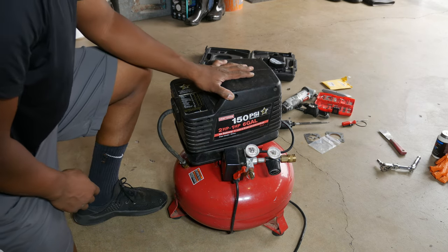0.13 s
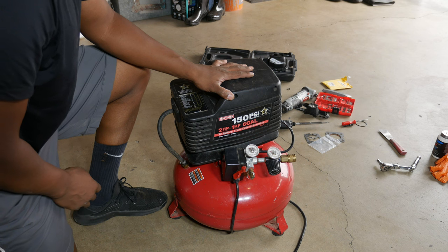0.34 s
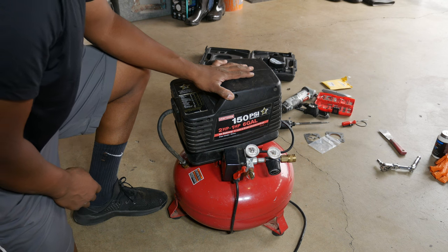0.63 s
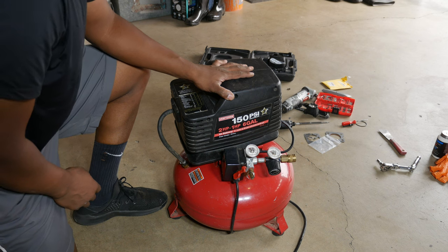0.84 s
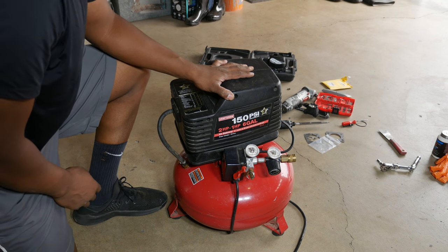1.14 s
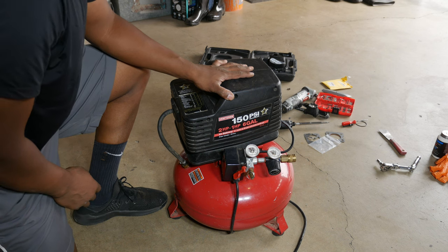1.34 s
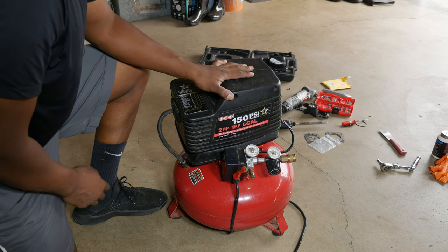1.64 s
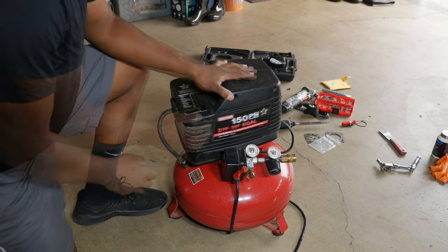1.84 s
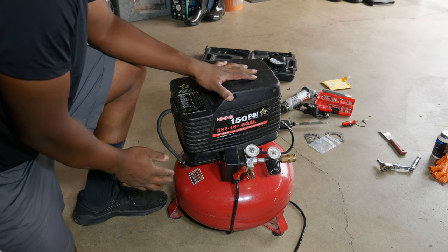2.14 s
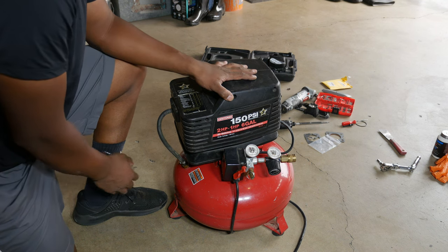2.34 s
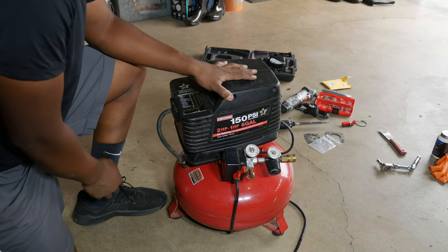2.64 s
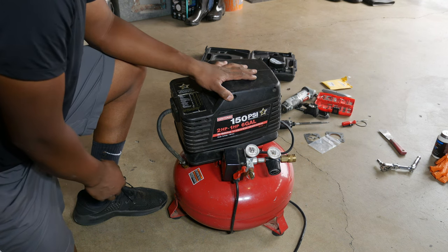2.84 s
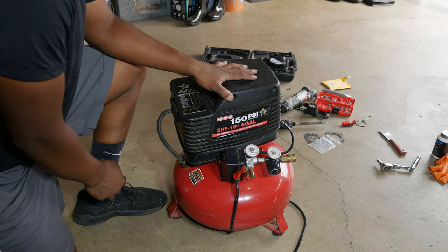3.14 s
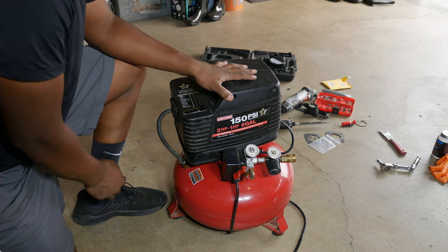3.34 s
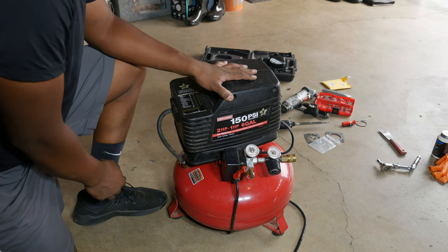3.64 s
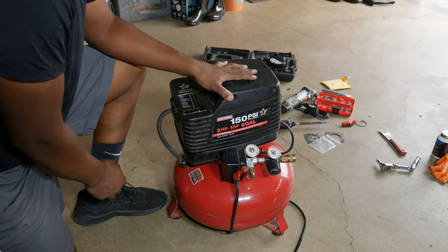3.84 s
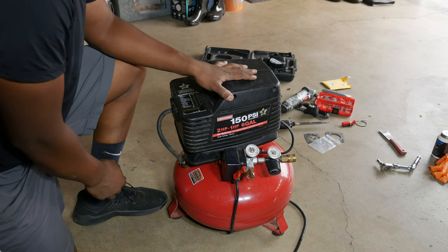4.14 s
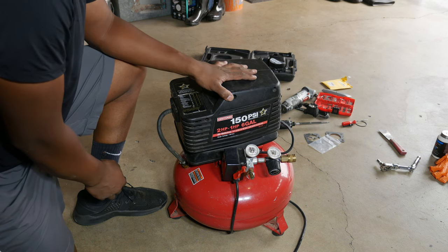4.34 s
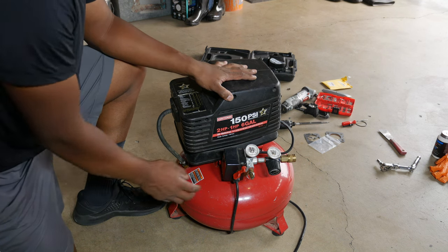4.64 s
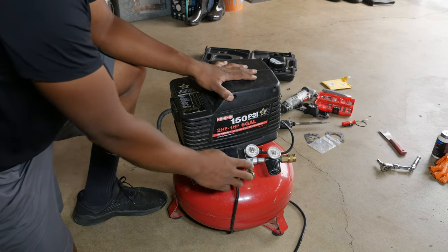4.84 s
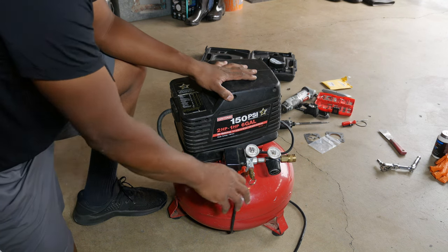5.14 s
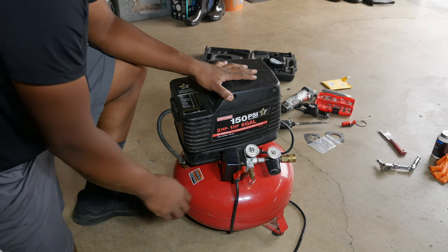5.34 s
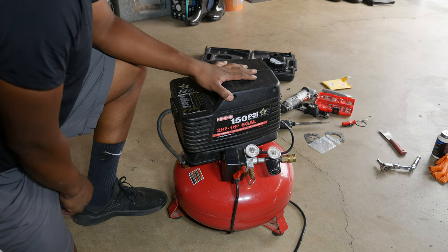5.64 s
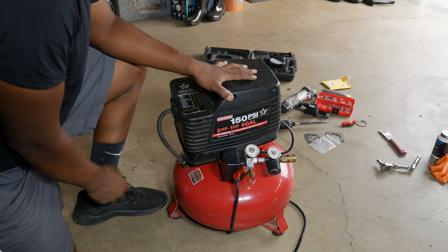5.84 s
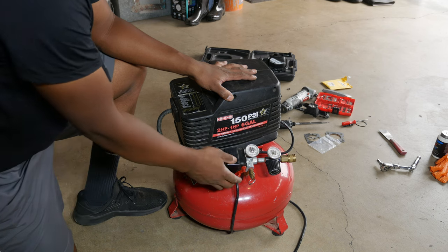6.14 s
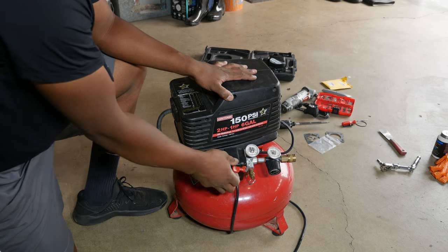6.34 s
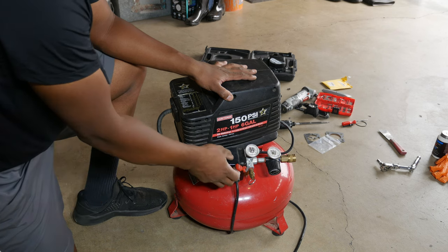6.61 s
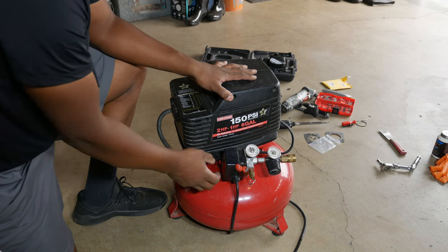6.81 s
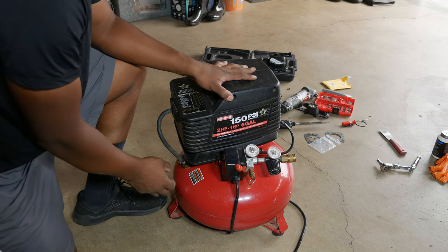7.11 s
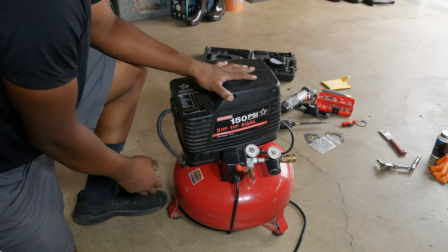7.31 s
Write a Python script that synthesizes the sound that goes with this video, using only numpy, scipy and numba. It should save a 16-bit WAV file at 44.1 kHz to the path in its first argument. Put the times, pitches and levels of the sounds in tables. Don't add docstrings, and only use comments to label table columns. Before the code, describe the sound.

A small piston air compressor hammers steadily in a garage, shifts to a harsher high-pressure run, then is switched off, knocking down to a thin leaking hiss.

```python
import sys
import numpy as np
from scipy import signal
from scipy.fft import rfft, irfft, next_fast_len
from scipy.io import wavfile
from scipy.ndimage import uniform_filter1d
from numba import njit

SR = 44100
rng = np.random.default_rng(int(sys.argv[2]) if len(sys.argv) > 2 else 0)


def makeup_ratio(level_db):
    decades = np.asarray(level_db, float) / 20
    return 10 ** decades


def file_out(sig):
    cols = np.atleast_2d(sig).T
    lim = np.clip(cols, -1, 1)
    pcm = np.round(lim * 32767).astype(np.int16)
    wavfile.write(sys.argv[1], SR, pcm)


N = 329427
T = np.arange(N) / SR

# [order/crank speed, level/dB]
ORDERS_PART = [(1, -10.0), (2, -5.0), (3, -20.0), (4, -4.0), (5, -7.5), (6, -15.5), (7, -1.0), (8, -20.5),
               (9, -9.0), (10, -7.0), (11, -3.0), (12, -17.0), (13, -5.0), (14, -9.5), (15, -9.5), (16, 1.0),
               (17, -10.5), (18, -8.5), (19, -9.5), (20, -13.5), (21, -13.5), (22, -8.0), (23, -14.5),
               (24, -12.0), (25, -13.0), (26, -3.0), (27, -2.0), (28, -3.0), (29, -2.5),
               (30, -3.5), (31, -7.5), (32, -2.5), (33, -23.0), (34, 1.5), (35, 0.5), (36, -1.0), (37, -6.5),
             (38, -1.0), (39, -9.0), (40, -3.5), (41, 0.0), (42, -4.5), (43, -3.0), (44, -10.5), (45, -7.5),
             (46, -19.5), (47, -12.0), (48, 0.0), (49, -6.0), (50, -2.0), (51, -17.0), (52, -5.5),
             (53, -12.0), (54, -8.0), (55, -6.0), (56, -9.0), (57, -3.5), (58, -17.5)]
ORDERS_FULL = [(1, -8.0), (2, -1.5), (3, -8.5), (4, -5.0), (5, -0.5), (6, -23.5), (7, 0.0), (8, -7.0),
               (9, -5.0), (10, -1.5), (11, 2.0), (12, -8.0), (13, -13.5), (14, -9.0), (15, -3.0),
               (16, -23.5), (17, 4.0), (18, -14.0), (19, -0.5), (20, -8.5), (21, 1.0), (22, -3.5),
               (23, -13.0), (24, -12.5), (25, -5.5), (26, 1.0), (27, 1.5), (28, 3.0), (29, -1.5),
               (30, -2.5), (31, -5.0), (32, 0.0), (33, 0.5), (34, -3.5), (35, -1.0), (36, -0.5), (37, -2.5),
             (38, -1.0), (39, 2.0), (40, 4.5), (41, -1.5), (42, 3.0), (43, 2.5), (44, -2.0), (45, 3.5),
             (46, -6.0), (47, -4.0), (48, -5.5), (49, -0.5), (50, -3.5), (51, -5.5), (52, -6.0), (53, -5.5),
             (54, -17.0), (55, -14.5), (56, -10.0), (57, -7.5), (58, -5.5)]
# [order/crank speed, level/dB]
WHINE_PART = [(60, -12.0), (63, -7.0), (64, -9.0), (65, -11.5), (66, -11.5), (68, -2.0), (69, -15.0),
              (73, -12.0), (75, -7.0), (78, -6.5), (79, -5.0), (83, -7.0), (84, -1.5), (85, -8.5),
              (86, -2.5), (87, -6.5), (92, -6.5), (96, 1.5), (106, 1.5), (107, -5.5)]
WHINE_FULL = [(59, -14.0), (60, -13.0), (61, -13.0), (64, -10.5), (65, -11.5), (66, -12.5), (67, -9.5),
              (70, -14.0), (72, -13.5), (75, -11.0), (77, -9.5), (80, -10.0), (83, -7.0), (87, -3.0),
              (93, -3.0), (103, -5.0), (105, -3.0), (106, -4.5), (107, 0.0), (109, -1.5)]
# [f/Hz, density/dB per Hz]
ROAR_PART = [(18, -46), (30, -16), (92, -17), (137, -9), (173, -10.5), (325, -3.5), (676, -5.5),
             (732, -6.5), (1080, -11.5), (1600, 1), (3170, -5), (4950, -5.5), (7140, -17.5), (10300, -18),
             (15600, -26)]
ROAR_FULL = [(25, -27), (225, -6.5), (494, -3.5), (578, -8.5), (771, -7), (1060, -8.5), (1230, -8.5),
             (1880, -1.5), (2600, -3.5), (3250, -8), (4200, -6), (6950, -17), (10500, -18.5), (15600, -26)]
# [f/Hz, width/Hz, gain/dB]
SHROUD_DIP = (3080, 800, -5.5)
INTAKE_LIFT = (5500, 1470, 3.7)
# [start/s, end/s]
FADE_S = (1.74, 2.03)
# [t/s, low tank ring level/dB, high ring relative to low/dB]
KNOCKS = [(6.409, -26, 2), (6.452, -31, 8), (6.469, -35, 5), (6.499, -27.5, 4), (6.544, -27, 1),
          (6.562, -37, 11), (6.597, -25.5, 1.5), (6.630, -35, 5), (6.706, -28.5, 1.5), (6.732, -32, -10),
          (6.752, -40, 3), (6.853, -30, -15), (6.908, -38, -22)]
# [f/Hz, level/dB, t60/s]
RINGS = [
    [(180, -16, 0.034), (250, -9, .03), (482, -6.5, 0.041)],
    [(334, -1.5, 0.34), (383, 5, 0.06)],
    [(762, 4.5, 0.13), (820, 5, 0.051)],
    [(1195, 10, 0.048)],
    [(1630, 4.5, 0.034), (1990, -8, 0.05)],
]
# [t/s, level/dB]
TICKS = [
    (6.627, -19),
    (6.761, -20.5),
]
# [t/s, level/dB, f/Hz]
CLICKS = [
    (2.1, -24, 5500),
    (6.358, -26, 7000),
]
# [f/Hz, width/Hz, level/dB]
FITTING = [(1980, 61, -17.5), (2510, 110, -12), (3190, 68, -16.5), (4375, 170, -9), (4750, 130, -5),
           (5019, 85, 2.5), (5180, 110, -2), (5570, 220, -4.5), (5930, 78, -6.5)]
# [f/Hz, width/Hz, level/dB]
JET = [(7100, 190, 0), (7940, 350, -5), (8300, 250, -6), (9020, 230, -9), (9800, 230, -7), (10600, 160, -6),
       (11300, 150, -1), (12100, 250, -5), (12660, 300, -1.5), (13500, 260, 2), (14200, 300, -12),
       (14530, 300, -1), (15300, 200, -4)]
# [f/Hz, density/dB per Hz]
SKIRT = [(530, -67), (900, -39), (1980, -24), (2150, -26.5), (2510, -19), (3510, -21), (4730, -7.5),
         (5010, 5), (6800, -23), (8840, -35), (15000, -120)]
# [t/s, level/dB]
FLOW = [
    (0, -9.5),
    (1.85, -3),
    (2.1, 1),
    (6.3, 0.5),
    (6.47, 2.5),
    (6.65, 3),
    (7.47, 2.5),
]
# [f/Hz, density/dB per Hz]
GARAGE = [(15, -50), (25, -25), (85, -6), (227, -17), (485, -11), (564, -10), (690, -21), (1220, -7),
          (1400, -8), (1820, -3), (3080, -120)]
# [f/Hz, width/Hz, gain/dB]
MIC_DIPS = [(7180, 1130, -4.5), (8680, 560, -2.5), (11480, 1070, -12.5)]

PART_HZ, PART_SAG_HZ_PER_S, FULL_HZ, FULL_SAG_HZ_PER_S = 46.2, .055, 45.49, .045
OFF_S, COAST_S = 6.362, .22
SLAP_ORDER = 42
PART_DB, PART_DB_PER_S, FULL_DB = -21, -0.53, -22.5
SHADE_S, SHADE_DB = 6.17, -2.1
DYING_DB_PER_S2, DULLING_DB_PER_S, DULLEST_DB = -125, -21, -8
RISE_DB, RISE_S = 1, 0.025
THUMP_DB, FRAME_DB, VALVE_DB = 21, 3, -12
THUMP_FOLLOWS, FRAME_FOLLOWS, VALVE_FOLLOWS = .95, 1.2, .7
JET_DB, WHISTLE_DB, WHISTLE_FOLLOWS, SPUTTER_DB = -41, -28.5, 1, 0.53
SURGE_S, SURGE_DB, SURGE_WIDTH_S = 6.75, 4, 0.042
GARAGE_DB, HUM_HZ, HUM_DB = -51.5, 570, -62
TOP_HZ = 15550


def compressor():
    since = coasting()
    part_hz = PART_HZ - PART_SAG_HZ_PER_S * T
    full_hz = (FULL_HZ - FULL_SAG_HZ_PER_S * (T - 2)) * np.exp(-since / COAST_S)
    part = pump(part_hz, ORDERS_PART, WHINE_PART, ROAR_PART,
                line_db=-11.0, spread=1.2, puff=0.26, treble_db=0.46, until_s=2.1)
    dulling_db = np.maximum(DULLING_DB_PER_S * since, DULLEST_DB)
    full = pump(full_hz, ORDERS_FULL, WHINE_FULL, ROAR_FULL,
                line_db=-12.0, spread=0.64, puff=0.24, treble_db=dulling_db, until_s=7)
    share = np.interp(T, FADE_S, (0, 1))
    shade_times_s = (SHADE_S - .02, SHADE_S + .02, OFF_S - .03, OFF_S)
    shade_db = SHADE_DB * np.interp(T, shade_times_s, (0, 1, 1, 0))
    rise_db = RISE_DB * (1 - np.exp(-since / RISE_S))
    full_db = FULL_DB + shade_db + DYING_DB_PER_S2 * since ** 2 + rise_db
    return (1 - share) * makeup_ratio(PART_DB + PART_DB_PER_S * T) * part + share * makeup_ratio(full_db) * full


def coasting():
    return np.maximum(T - OFF_S, 0)


def pump(hz, orders, whine, roar, line_db, spread, puff, treble_db, until_s):
    turns = np.cumsum(hz) / SR
    spin = makeup_ratio(75 * np.log10(hz / hz[0]))
    live = turns[:int(until_s * SR)]
    slip = 0.00093 * walk(40, size=len(live))
    tones = np.zeros(N)
    tones[:len(live)] = lines(orders, live + slip, wobble=0.29, jitter=0.27, spread=spread, smear=0.18, lag=9)
    tones[:len(live)] += lines(whine, live, wobble=.5, jitter=.45, spread=0, smear=0, lag=0)
    noise, centres = bands(roar, count=10)
    noise[0] *= spin
    swell, rush = walk(3.05), walk(16)
    air = 0
    for band, centre in zip(noise, centres):
        is_treble = centre > 3000
        depth = puff * min(1., (3500 / centre) ** 0.41)
        offset = 0.46 * rng.standard_normal() * is_treble
        gate = 1 + depth * np.cos(2 * np.pi * (turns + offset))
        tilt_db = treble_db * np.clip(np.log2(centre / 1900), 0, 3.0)
        flutter_db = 0.48 * swell + 0.71 * walk(14) + 0.22 * is_treble * rush
        air = air + band * gate * makeup_ratio(flutter_db + tilt_db)
    for band_hz, width_hz, db in (SHROUD_DIP, INTAKE_LIFT):
        air = air - (1 - makeup_ratio(db)) * resonate(air, band_hz, width_hz)
    return spin * makeup_ratio(line_db) * tones + air


def lines(table, turns, wobble, jitter, spread, smear, lag):
    rows = np.array(table, float)
    order, step = np.round(rows[:, :1]), SR // 50
    chance = rng.standard_normal((2, len(rows), N // step + 2))
    size = makeup_ratio(rows[:, 1:2]) * (1 + wobble * uniform_filter1d(chance[0], size=7))
    slap = (order > 14) & (order < 50)
    slap_spread = spread * (0.71 + 2.78 * abs(np.log2(order / SLAP_ORDER)))
    start = rng.standard_normal(order.shape) * np.where(slap, slap_spread, 10)
    start += np.cumsum(smear * rng.standard_normal(order.shape), axis=0)
    start -= lag * np.log(order)
    shift = start + jitter * uniform_filter1d(chance[1], size=4)
    return sines(order[:, 0].copy(), turns, size, shift, step)


@njit
def sines(orders, turns, size, shift, step):
    out = np.zeros(len(turns))
    for k in range(len(orders)):
        for j in range(len(turns) // step):
            swell = (size[k, j + 1] - size[k, j]) / step
            slide = (shift[k, j + 1] - shift[k, j]) / step
            for u in range(step):
                phase = 2 * np.pi * orders[k] * turns[j * step + u] + shift[k, j] + u * slide
                out[j * step + u] += (size[k, j] + u * swell) * np.sin(phase)
    return out


def knocks():
    out = np.zeros(N)
    thump, low, high, frame, valve = RINGS
    for (s, db, high_db), after in zip(KNOCKS, KNOCKS[1:] + [(9,)]):
        speed_db = -20 * np.log10(np.e) * (s - OFF_S) / COAST_S
        parts = ((thump, THUMP_DB + THUMP_FOLLOWS * speed_db),
                 (low, 0),
                 (high, high_db),
                 (frame, FRAME_DB + FRAME_FOLLOWS * speed_db),
                 (valve, VALVE_DB + VALVE_FOLLOWS * speed_db))
        for modes, over_db in parts:
            add(out, s, db + over_db - 2.5, modes, after[0])
    for s, db in TICKS:
        add(out, s, db - 2.0, valve, N / SR)
    return out


def add(out, s, db, modes, choked_s):
    t, at = T[:SR // 2], int(s * SR)
    attack = 1 - np.exp(-t / 0.0021)
    choke = np.exp(-np.maximum(t - choked_s + s, 0) / 0.011)
    for hz, mode_db, t60 in modes:
        struck_hz = hz * (1 + 0.013 * rng.standard_normal())
        ring = np.sin(2 * np.pi * struck_hz * t) * np.exp(-np.log(1000) * t / t60)
        out[at:at + len(t)] += makeup_ratio(db + mode_db) * (ring * attack * choke)[:N - at]


def leak():
    whistle = hiss(FITTING, flutter_db=2.8, widen=2.17) + makeup_ratio(-5.5) * bands(SKIRT, count=2)[0].sum(0)
    jet = hiss(JET, flutter_db=1.8, widen=2.9) * makeup_ratio(0.71 * walk(15))
    full, flow_db = np.interp(T, FADE_S, (0, 1)), curve(FLOW)
    whistle_db = WHISTLE_DB + WHISTLE_FOLLOWS * flow_db + SPUTTER_DB * walk(25)
    whistle_db += SURGE_DB * np.exp(-((T - SURGE_S) / SURGE_WIDTH_S) ** 2 / 2)
    return full * makeup_ratio(whistle_db) * whistle + makeup_ratio(JET_DB + flow_db) * jet


def hiss(modes, flutter_db, widen):
    white = rng.standard_normal(N)
    total = 0
    for hz, width_hz, db in modes:
        once = resonate(white, hz, widen * width_hz)
        twice = resonate(once, hz, widen * width_hz)
        total = total + makeup_ratio(db + flutter_db * walk(26)) * twice
    return level(total, 0)


def clicks():
    out, t = np.zeros(N), T[:SR // 20]
    for s, db, hz in CLICKS:
        at = int(s * SR)
        burst = rng.standard_normal(len(t)) * np.exp(-t / 0.005)
        snap = resonate(burst, hz, 0.39 * hz)
        out[at:at + len(t)] += makeup_ratio(db) * snap / snap[:SR // 200].std()
    return out


def room(x, t60):
    t = T[:int(t60 * SR)]
    tail = rng.standard_normal(len(t)) * np.exp(-np.log(1000) * t / t60) * (t > .003)
    return signal.fftconvolve(x, tail / np.sqrt(np.sum(tail ** 2)))[:N]


def shimmer(x, patchy_db, from_hz):
    f, _, z = signal.stft(x, SR, nperseg=1024)
    patch = uniform_filter1d(rng.standard_normal(z.shape), size=2, axis=0)
    patch = uniform_filter1d(patch, size=4, axis=1)
    depth_db = patchy_db * np.clip(np.log2(f / from_hz + 1e-9), 0, 1)[:, None]
    return signal.istft(z * makeup_ratio(depth_db * patch / patch.std()), SR, nperseg=1024)[1][:N]


def garage():
    hum = makeup_ratio(HUM_DB + 2.2 * walk(6)) * np.sin(2 * np.pi * HUM_HZ * T + .3 * walk(5.1))
    return level(bands(GARAGE, count=2)[0].sum(0), GARAGE_DB) + hum


def level(x, db):
    return x * makeup_ratio(db) / np.sqrt(np.mean(x ** 2))


def curve(table, col=1):
    rows = np.array(table)
    return np.interp(T, rows[:, 0], rows[:, col])


def walk(rate, size=N):
    knots = np.repeat(rng.standard_normal(int(N / SR * rate) + 3), 4)
    knots = uniform_filter1d(knots, 5)
    return 1.2 * np.interp(T[:size] * rate * 4, np.arange(len(knots)), knots)


def bands(table, count=10):
    size = next_fast_len(N)
    octave = np.log2(np.arange(1, size // 2 + 2) * SR / size)
    rows = np.array(table)
    shape_db = np.interp(octave, np.log2(rows[:, 0]), rows[:, 1])
    full = rfft(rng.standard_normal(size)) * makeup_ratio(shape_db)
    centres = np.linspace(np.log2(60), np.log2(14000), count)
    out = np.array([irfft(full * np.interp(octave, centres, row), size)[:N] for row in np.eye(count)])
    return out / out.sum(0).std(), 2 ** centres


def resonate(x, hz, width_hz):
    return signal.lfilter(*signal.iirpeak(hz, hz / width_hz, fs=SR), x)


def scene():
    hits = knocks()
    mid = compressor() + hits + makeup_ratio(-8.5) * room(hits, t60=0.5) + clicks() + leak() + garage()
    mid = shimmer(mid, patchy_db=2.5, from_hz=3970)
    side = np.roll(mid, SR // 300) * walk(60)
    treble = signal.sosfilt(signal.butter(2, 7000, "high", fs=SR, output="sos"), side)
    side = makeup_ratio(-21) * side + makeup_ratio(-21) * treble
    return np.array([mid + side, mid - side])


def roll_off(x):
    return signal.sosfilt(signal.butter(12, 15800, fs=SR, output="sos"), x)


def record(dry):
    for hz, width_hz, db in MIC_DIPS:
        dry = dry - (1 - makeup_ratio(db)) * resonate(dry, hz, width_hz)
    dry = signal.sosfilt(signal.butter(1, 40, "high", fs=SR, output="sos"), dry)
    dry = signal.sosfilt(signal.ellip(10, .2, 80, TOP_HZ, fs=SR, output="sos"), dry)
    return roll_off(dry)


dry = scene()
out = record(dry)
file_out(out)
```